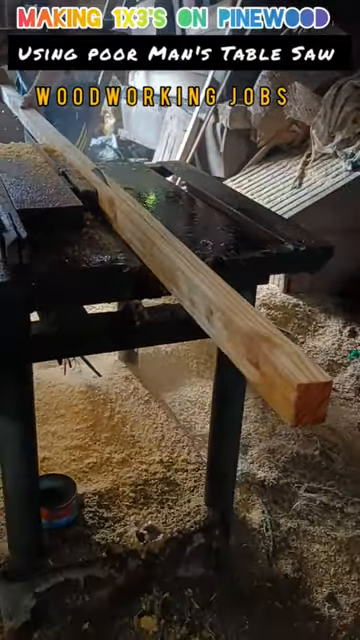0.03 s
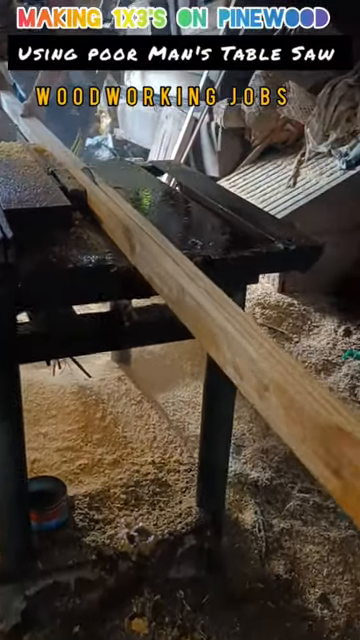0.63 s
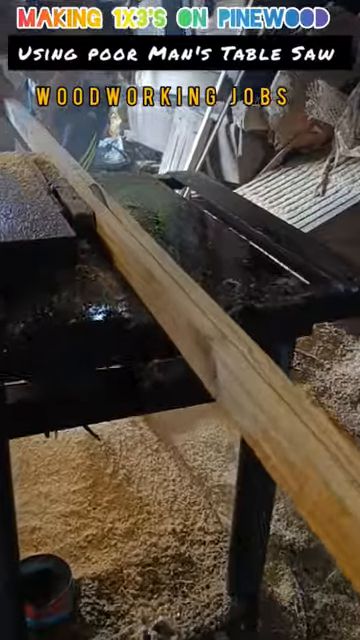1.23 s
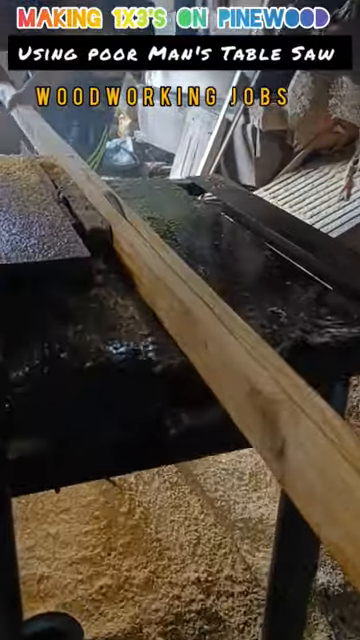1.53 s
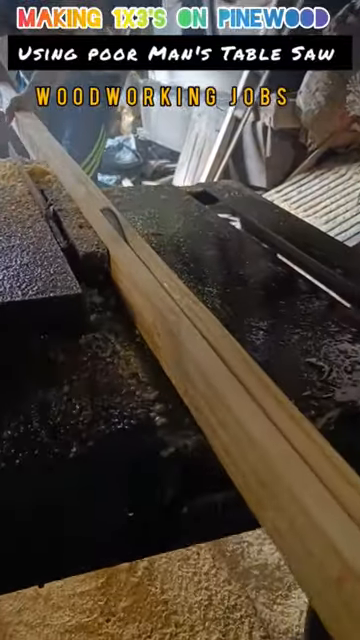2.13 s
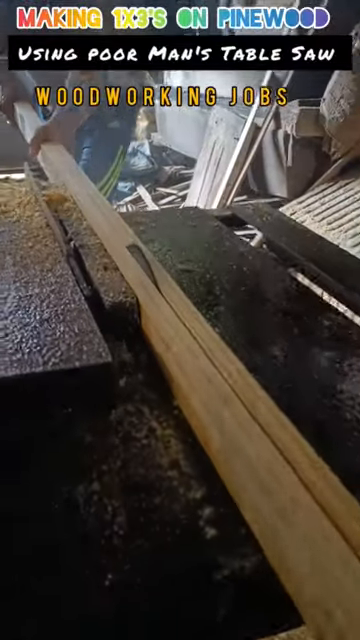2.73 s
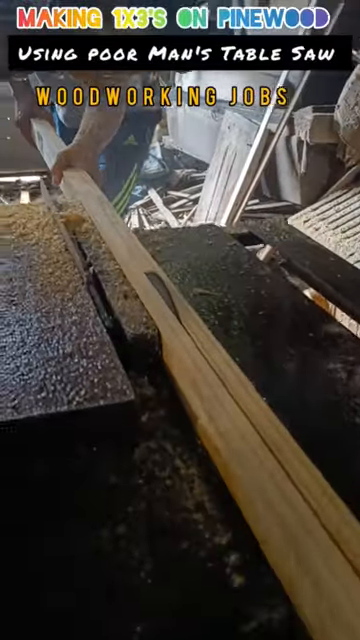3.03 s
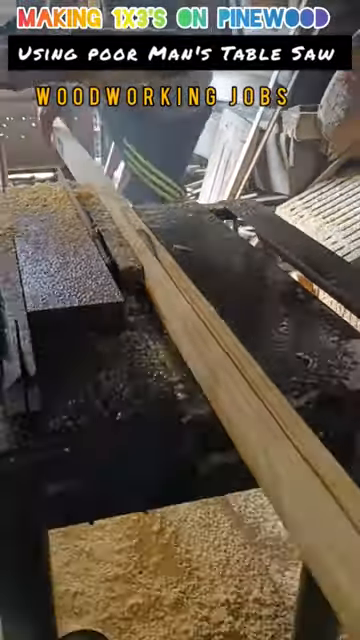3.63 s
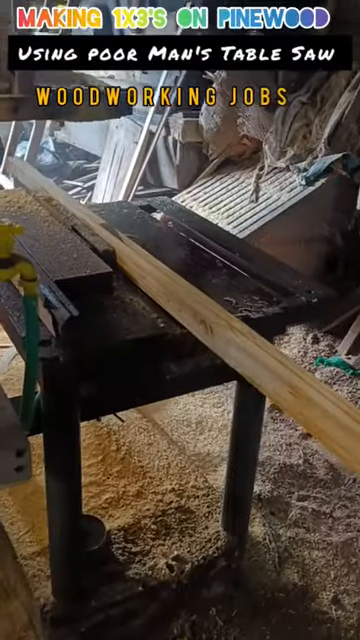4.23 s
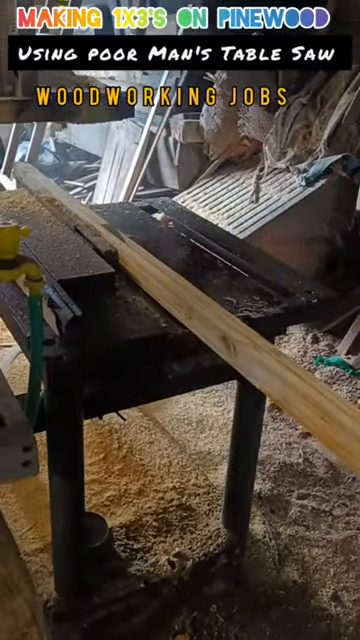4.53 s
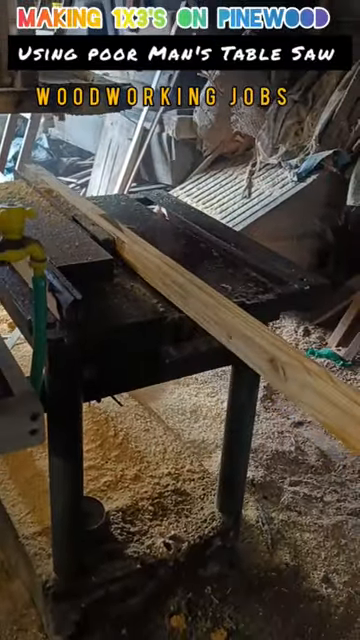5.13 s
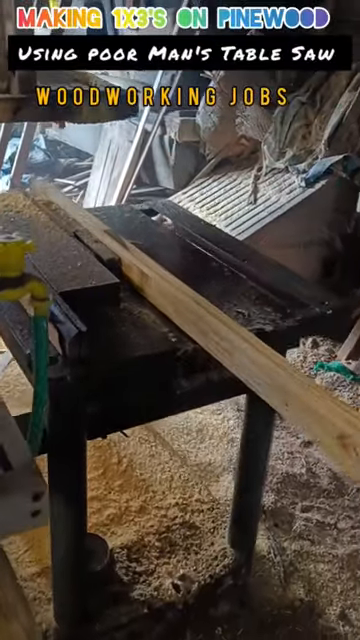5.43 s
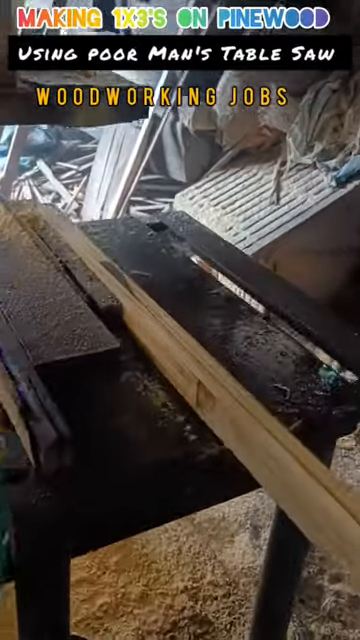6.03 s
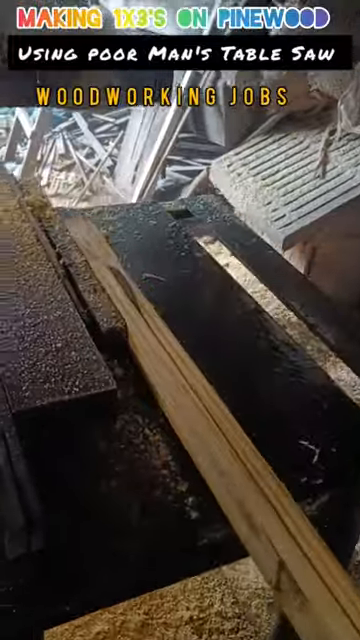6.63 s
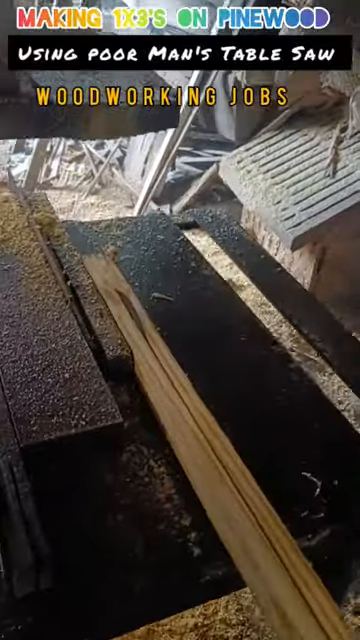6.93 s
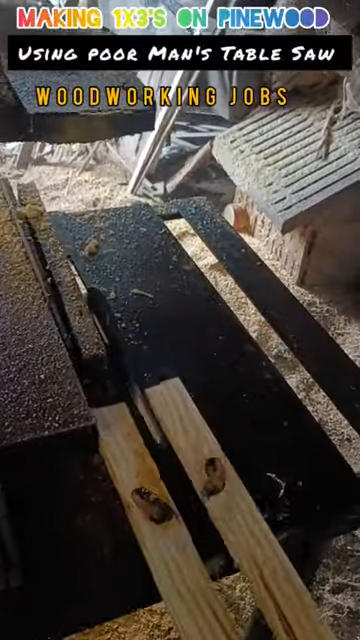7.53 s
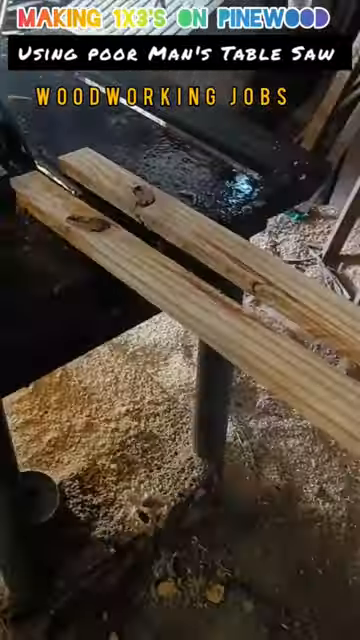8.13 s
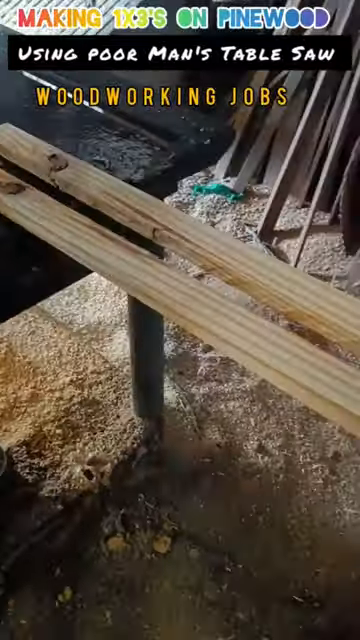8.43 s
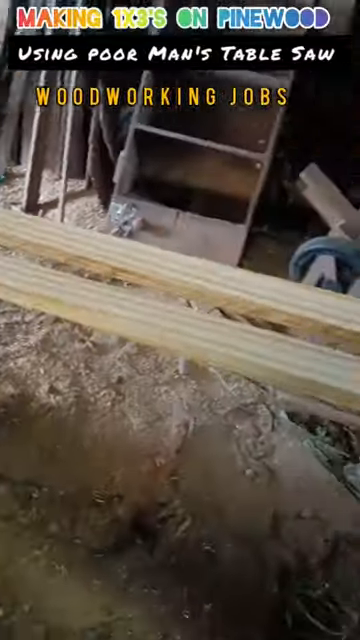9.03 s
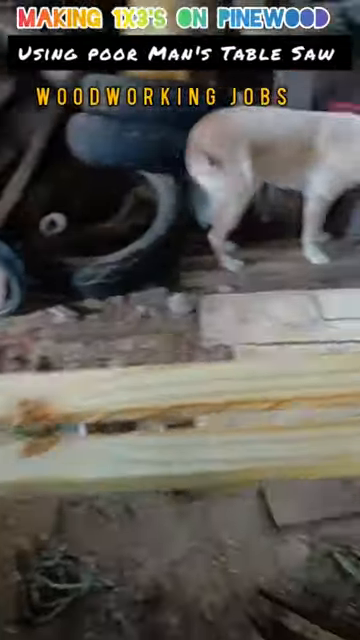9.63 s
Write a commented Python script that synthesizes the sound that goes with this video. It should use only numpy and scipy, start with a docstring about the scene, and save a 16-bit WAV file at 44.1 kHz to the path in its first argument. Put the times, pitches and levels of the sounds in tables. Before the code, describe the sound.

A table saw whines and rasps through a long board, with squeals from the wood, then runs free with a quieter engine hum.

```python
"""Ripping pine on a table saw

A long board is fed into an engine-driven saw in an open shed. The periodic impact of the teeth gives
a whine that falls in pitch under load, torn fibres a broadband rasp, and the pinched board squeals.
Draught and chips strike a hand-held two-port microphone, mainly on the right. The board comes free.
The level dips briefly twice; after the second dip the engine is heard from the yard, easing off."""
import sys
import numpy as np
from scipy import signal
from scipy.fft import rfft, irfft
from scipy.io import wavfile

SR = 44100
rng = np.random.default_rng(int(sys.argv[2]) if len(sys.argv) > 2 else 0)


def materialize(psi):
    """Save the field psi as 16-bit PCM at rate SR to the path in sys.argv[1].

    A 1-D psi becomes a single channel; in a 2-D psi each row is a channel.
    """
    bounded = np.clip(np.atleast_2d(psi).T, -1, 1)
    quanta = np.round(bounded * 32767).astype(np.int16)
    wavfile.write(sys.argv[1], SR, quanta)


N = 436149
TIME = np.arange(N) / SR
FREQS = np.maximum(np.arange(N // 2 + 1) * SR / N, 1)
TEETH = 30


# unevenness of the bite: t/s, share of chatter (0-1), depth of the once-a-turn flutter (0-1)
BITE = [(0, .62, .05), (1.4, .9, .15), (2.2, .52, .45), (3.5, .6, .2), (3.85, .48, .85), (4.9, .8, .1),
        (6.3, .62, .3), (7.2, .33, .1)]
WORKING_HZ, SAG_DB_PER_HZ = 1339, .032  # the whine grows as the tooth rate sags below its working value

def whine(tooth, tooth_hz, rasp_db, flank_db, surge_db, octave_surge_db):
    """Periodic forcing: tooth impacts sound three harmonics, and uneven bites add noise sidebands."""
    scraping_db = flank_db - flank_db.mean()  # a scraping flank feeds every harmonic
    sag_hz = WORKING_HZ - tooth_hz
    whine_db = -20.5 + SAG_DB_PER_HZ * sag_hz + .27 * scraping_db + surge_db
    octave_db = -32.7 + SAG_DB_PER_HZ * np.maximum(sag_hz, 0) + .6 * scraping_db + octave_surge_db
    third_db = rasp_db - 10 + .23 * scraping_db
    rough, flutter = np.clip(curves(BITE), 0, 1)
    rough = np.clip(rough - .017 * surge_db, 0, 1)  # a surge locks the blade into a purer tone
    uneven = 1.72 * chatter(width_hz=43, alike=.3) + .67 * chatter(width_hz=96, alike=.26)
    lag = np.array([[0], [.9]]) * wobble(hz=2.6)  # phase between the ports of the moving microphone
    first = np.sqrt(1 - rough ** 2) * np.exp(1j * lag) + rough * uneven
    first = first / np.sqrt(.7 + .47 * abs(first) ** 2)  # the whine's loudest peaks are softly limited
    harder_bite = 1 + flutter * np.sin(tooth / TEETH + 2 * wobble(hz=14))  # the blade wobbles
    first = first * harder_bite / np.sqrt(1 + flutter ** 2 / 2)
    second = .5 + .68 * chatter(width_hz=46, alike=.54)
    third = chatter(width_hz=55, alike=.33)
    spin = np.exp(1j * tooth)
    tone = undb(whine_db) * first * spin + undb(octave_db) * second * spin ** 2
    tone += undb(third_db) * third * spin ** 3
    return np.sqrt(2) * tone.imag


# binding of the wood: centre t/s, duration/s, rise of the whine/dB, rise of its octave/dB
SURGES = [(0.055, 0.41, 9, 2), (0.362, 0.24, 10, 4), (0.556, 0.24, 10, -10), (0.758, 0.21, 5, 15),
          (0.928, 0.25, 9, 8), (1.167, 0.13, 4, 9), (1.276, 0.069, -2, 14), (1.468, 0.13, 3, 15.5),
          (1.855, .2, 3.5, 0), (2.128, 0.085, 8.5, 0), (2.292, 0.09, 8.5, 7), (2.389, 0.072, 3, 16),
          (2.68, .3, 4, 11), (2.9, .25, 0, 9), (3.43, .22, 5.5, 0), (4.043, 0.53, 5.5, 6),
          (4.382, 0.29, 6.5, 3), (4.548, .1, -0.5, 6), (4.889, 0.17, 3, 5), (5.653, 0.13, 9.5, 4),
          (5.9, 0.42, 5, 5.5), (6.803, 0.24, 6.5, 11), (6.949, 0.2, 6.5, 12.5), (7.269, 0.15, 7, 9)]

def surges():
    """Binding wood drives the blade harder; returns the rises in dB of the whine and its octave."""
    return sum(np.outer(rises_db, swell(s, length)) for s, length, *rises_db in SURGES)


# spectra of the teeth's rasp, the board, the blade's flank and the table: f/Hz, relative level/dB
RASP_SPECTRUM = [(1200, -18.5), (3400, -7), (4100, -1.5), (4600, -3), (5300, 1.5), (6200, -2.5), (6900, 3),
                 (8200, 1.5), (8800, -3.5), (9300, 2), (10200, -3.5), (11300, -9.5), (12400, -5.5),
                 (15500, -9)]
BOARD_SPECTRUM = [(60, -25), (330, -29), (700, -13), (880, -0.5), (1080, -4), (1300, 7), (1600, 1),
                  (2050, 2), (2400, -1.5), (2680, 1), (3000, -10), (5000, -29)]
FLANK_SPECTRUM = [(2000, -31), (2950, 0.5), (3350, 5.5), (3900, 1.5), (4600, -4.5), (6500, -27)]
TABLE_SPECTRUM = [(40, -17), (75, 0.5), (130, -9), (190, -4), (320, -4.5), (420, 0), (620, 5.5),
                  (800, -3.5), (1300, -21.5)]

def kerf(tooth, rasp_db, flank_db, surge_db, near):
    """Source and filter: the noise of tearing fibres is shaped by blade, board and table."""
    board_db = -19 + .51 * (rasp_db - rasp_db.mean()) - .18 * surge_db
    table_db = -39 + 7 * near
    pulsing = (1 + .26 * np.cos(tooth)) * (1 + .12 * np.sin(tooth / TEETH))  # per tooth, per turn
    tearing = pulsing * undb(wobble(hz=906))
    rasp = spread(noise() * tearing * undb(.99 * wobble(hz=44.8)), response(RASP_SPECTRUM))
    rasp = wander(rasp, width_hz=300, life_s=.066, db=1.26)  # the bite shifts among blade modes
    board = spread(noise() * tearing * undb(1.1 * wobble(hz=35.02)), response(BOARD_SPECTRUM))
    flank = spread(noise() * tearing, response(FLANK_SPECTRUM))
    table = spread(noise(), response(TABLE_SPECTRUM))
    cut = rasp * undb(rasp_db + 6) + board * undb(board_db)
    cut += flank * undb(flank_db + 1.5) + table * undb(table_db)
    # the narrow modes of blade and board shift as the kerf grows
    return np.std(cut) * wander(cut, width_hz=51, life_s=.16, db=3)


# the board pinches the blade: centre t/s, duration/s, start f/Hz, end f/Hz, level/dB
SQUEALS = [(.45, .8, 930, 890, -33), (1.569, .4, 1758, 1707, -24.5), (1.658, .22, 3360, 3480, -26.5),
           (1.824, 0.24, 4200, 3950, -25), (2.04, 0.27, 2440, 2360, -25), (3.058, 0.65, 1614, 1593, -29.5),
           (4.37, .35, 4110, 4060, -28), (4.85, .5, 1227, 1105, -29), (5.25, .6, 1620, 1592, -26.5),
           (5.387, .16, 3320, 3280, -29), (5.68, .25, 4020, 3990, -29), (5.858, 0.46, 1574, 1658, -22.5),
           (6.063, 0.32, 2054, 1920, -25), (6.237, 0.65, 935, 890, -26), (6.259, .42, 1072, 1030, -27),
           (6.4, 0.167, 1170, 1220, -21.5), (7.201, 0.45, 1910, 1830, -30), (7.55, 0.31, 2070, 2068, -35)]

def squeals():
    """Frictional excitation: narrow resonances of the pinched board swell, glide and die away."""
    out = np.zeros((2, N))
    ringing = .19 + chatter(width_hz=26, alike=.84)
    for s, length, start_hz, end_hz, db in SQUEALS:
        span = np.flatnonzero(abs(TIME - s) < length / 2)
        tone = np.exp(1j * turns(np.linspace(start_hz, end_hz, len(span))))
        envelope = np.sqrt(2 * np.hanning(len(span)))
        waver = ringing[:, (span + rng.integers(N)) % N]
        out[:, span] += undb(db) * envelope * (tone * waver).imag
    return out


# the sawn halves touch the free teeth: t/s, level/dB
GRAZES = [(7.477, -30), (7.645, -28)]

def grazes(tooth):
    """Brief contact excites a ping on the second and third harmonics of the tooth rate."""
    ping = np.sin(2 * tooth) + undb(-5) * np.sin(3 * tooth)
    return np.sqrt(2) * ping * sum(undb(db) * swell(s, length=.028) for s, db in GRAZES)


PASS_S, PASS_M, WALK_M_PER_S = 9.05, .53, 1.36  # walking past the exhaust: time, least distance, speed

def running(shaft, shaft_hz, in_wood):
    """Whirr and engine; in the yard the whirr follows shaft speed, the exhaust the inverse-square law."""
    yard = TIME > DIP_TIMES[1]
    whirr_db = np.where(yard, -28.5 + .42 * (shaft_hz - 46.5), -30.5 - 13 * in_wood)
    opening_db = -48 + 9.5 * ramp(end=7.82, length=.11)  # the exhaust opens up once the load is gone
    passing_db = -30.5 - 20 * np.log10(np.hypot(1, WALK_M_PER_S * (TIME - PASS_S) / PASS_M))
    exhaust_db = np.where(yard, passing_db, opening_db) - 13.6 * in_wood
    return whirr(shaft, whirr_db) + engine(shaft, yard) * undb(exhaust_db)


# engine orders: multiple of the shaft rate, relative level/dB at the table, relative level/dB in the yard
ENGINE_ORDERS = [(1, -27, -17), (2, -11, -12), (3, 8, -3), (4, -14, -1.5), (5, -22, -5.5), (6, -27, -4),
                 (8, -3.5, -15), (9, -7, -31), (11, -6, -12)]

def engine(shaft, yard):
    """A harmonic series on the shaft rate, modulated in phase and amplitude by uneven firing."""
    crank = shaft + .18 * wobble(hz=16)
    hum = 0
    for order, table_db, yard_db in ENGINE_ORDERS:
        amplitude = undb(np.where(yard, yard_db, table_db) + 2.6 * wobble(hz=5))
        hum = hum + amplitude * np.sin(order * crank + rng.uniform(0, 2 * np.pi))
    return hum


# spectrum of air noise and clatter: f/Hz, relative level/dB
WHIRR_SPECTRUM = [(30, -25), (80, -5), (280, -10), (345, -15), (480, -7.5), (730, -11.5), (1000, -8),
                  (1400, -11), (2400, -13), (3400, -20.5), (6400, -26.5), (9200, -27), (11200, -35.5),
                  (12600, -29), (15000, -39)]
# resonances of the spinning blade and its steel table: f/Hz, bandwidth/Hz, relative level/dB
TABLE_MODES = [(400, 12, -14.5), (863, 65.2, -11), (1285, 100, -3.5), (1412, 46, -3.5)]

def whirr(shaft, whirr_db):
    """Turbulence at the blade and the clatter of belt and engine force the table's modes."""
    clatter = (1 + .19 * np.cos(shaft)) * undb(1.43 * wobble(hz=40))
    air = spread(noise() * clatter, response(WHIRR_SPECTRUM))
    air = wander(air, width_hz=37, life_s=.91, db=3)
    modes = sum(undb(db) / np.sqrt(width) / (1 + 1j * (FREQS / hz - hz / FREQS) * hz / width)
                for hz, width, db in TABLE_MODES)
    sawdust = spread(noise(), response(RASP_SPECTRUM)) * undb(-36 + 4.8 * wobble(hz=34.9))  # in spurts
    ringing = spread(noise() * clatter, modes)
    return (sawdust + air * undb(2.5) + ringing * undb(1)) * undb(whirr_db)


# spectrum of the blade's draught: f/Hz, relative level/dB
DRAUGHT_SPECTRUM = [(15, -2), (40, -2.5), (90, -8), (200, -12), (500, -17), (1500, -64)]
# gusts: centre t/s, duration/s, rise/dB
GUSTS = [(1.157, .14, 18), (5.25, 1.1, 8), (6.623, 0.16, 13), (7, 0.29, 7.5), (7.35, 0.095, 14),
         (9.149, .8, 14)]

def draught(near):
    """Turbulent pressure: air thrown off the blade buffets the microphone, more strongly close by."""
    level_db = -53 + 25.5 * near + sum(db * swell(s, length) for s, length, db in GUSTS)
    pressure = unit(colour(rng.standard_normal(N), response(DRAUGHT_SPECTRUM)))
    return pressure * undb(level_db + 2.7 * wobble(hz=17))


# chips striking the microphone: t/s, relative level/dB
CHIPS = [(1.804, -14.5), (2.087, -16), (2.428, -10.5), (2.594, -15), (2.773, -15), (2.987, -12),
         (3.045, -9.5), (3.283, -8), (6.543, -14), (6.611, -10.5), (6.66, -13.5), (7.002, -13),
         (7.061, -14), (7.083, -13), (7.332, -12.5)]
CHIP_DECAY_S = .0012

def chips():
    """Impulse response of a port: each chip's push leaks away exponentially with one slow rebound."""
    knocks = np.zeros(N)
    for s, db in CHIPS:
        span = np.flatnonzero((TIME >= s) & (TIME < s + .05))
        age = TIME[span] - s
        push = np.exp(-age / CHIP_DECAY_S) - .19 * np.exp(-age / (4 * CHIP_DECAY_S))
        knocks[span] -= undb(db + 9) * push
    return signal.sosfilt(signal.butter(2, 480, fs=SR, output="sos"), knocks)


def frame():
    """Forced vibration: the table's frame rumbles in its lowest mode while the board is pushed hard."""
    hz, half_width_hz = 74, 24
    rumble = colour(rng.standard_normal(N), 1 / (1 + ((FREQS - hz) / half_width_hz) ** 4))
    return unit(rumble) * undb(-48) * swell(5.1, length=1.7)


# coherence of the two ports in the shed: f/Hz, correlation (0-1)
COHERENCE = [(100, 1), (750, 0.56), (1400, 0.13), (2700, 0.18), (3300, 0.012), (5000, 0.18), (5900, 0.16),
             (7250, 0), (7750, 1), (8700, 0.56), (9400, 0.41), (11000, 0.029), (13400, 1), (14300, 0.23)]

def spread(pair, gain):
    """Partial coherence: two independent sounds are filtered and mixed as sum and difference; rms 1."""
    alike = np.clip(over_hz(COHERENCE), -1, 1)
    mid, side = colour(pair, gain * np.sqrt([1 + alike, 1 - alike]))
    return unit(np.array([mid + side, mid - side]))


def chatter(width_hz, alike):
    """Narrow-band noise: the complex envelope of an unevenly struck resonance, at each port."""
    steps = np.arange(N // 32 + 2)
    draws = rng.standard_normal((3, len(steps))) + 1j * rng.standard_normal((3, len(steps)))
    slow = signal.sosfilt(signal.butter(2, width_hz, fs=SR / 32, output="sos"), draws)
    ports = np.sqrt(alike) * slow[0] + np.sqrt(1 - alike) * slow[1:]
    ports = ports / np.std(ports)
    return np.array([np.interp(np.arange(N) / 32, steps, port) for port in ports])


def wander(pair, width_hz, life_s, db):
    """Spectral modulation: random peaks about width_hz wide come and go, lasting about life_s; rms 1."""
    _, _, spectra = signal.stft(pair, nperseg=2048, noverlap=1536)
    field = rng.standard_normal(spectra.shape[1:])
    across = np.fft.fftfreq(field.shape[0], SR / 2048)[:, None] * width_hz
    along = np.fft.rfftfreq(field.shape[1], 512 / SR) * life_s
    smoothing = np.exp(-2 * (across ** 2 + along ** 2))
    field = unit(np.fft.irfft2(np.fft.rfft2(field) * smoothing, field.shape))
    _, sound = signal.istft(spectra * undb(db * field), nperseg=2048, noverlap=1536)
    return unit(sound[:, :N])


def wobble(hz):
    """Random fluctuation up to about hz; rms 1."""
    draws = rng.standard_normal(N // 16)
    return unit(np.interp(2 * hz * TIME, np.arange(len(draws)), draws))


def noise():
    """Two independent white noises."""
    return rng.standard_normal((2, N))


def colour(x, gain):
    """Filtering as multiplication of the spectrum."""
    return irfft(rfft(x) * gain, N)


def response(table):
    """Amplitude response from points of f/Hz, level/dB."""
    return undb(over_hz(table))


def over_hz(table):
    """Interpolation on a logarithmic frequency axis."""
    hz, value = np.transpose(table)
    return np.interp(np.log(FREQS), np.log(hz), value)


def curves(table):
    """Linear interpolation in time of each column after t/s."""
    s, *columns = np.transpose(table)
    return [np.interp(TIME, s, column) for column in columns]


def turns(hz):
    """Phase in radians as the integral of frequency."""
    return 2 * np.pi * np.cumsum(hz) / SR


def swell(s, length):
    """A half-cosine envelope, 0-1, centred on s."""
    return np.cos(np.pi * np.clip((TIME - s) / length, -.5, .5))


def ramp(end, length):
    """A linear rise from 0 to 1, complete at end."""
    return np.clip(1 + (TIME - end) / length, 0, 1)


def undb(db):
    """Decibels to amplitude ratio."""
    return 10 ** (np.asarray(db) / 20)


def unit(x):
    """Normalisation to rms 1."""
    return x / np.sqrt(np.mean(x ** 2))


# tooth rate, sagging as the board is pushed and recovering as the push eases: t/s, f/Hz
LOADED_TOOTH_RATE = [(0, 1378), (.35, 1351), (.8, 1294), (1.03, 1235), (1.2, 1304), (1.35, 1479),
                     (1.47, 1473), (1.9, 1357), (2.6, 1330), (3.42, 1329), (3.74, 1526), (3.78, 1364),
                     (4.25, 1382), (4.75, 1347), (5.97, 1360), (6.3, 1306), (6.76, 1360), (6.95, 1321),
                     (7.35, 1321)]
# shaft rate as the unloaded engine eases off: t/s, f/Hz
FREE_SHAFT_RATE = [(7.5, 49.9), (8.05, 49.8), (8.2, 47.3), (9, 45.32), (9.89, 40.27)]
# rasp early and late in the cut, and scrape of the blade's flank: t/s, relative level/dB
RASP_EARLY = [(0.12, -23), (0.98, -25), (1.14, -20.5), (1.34, -26), (1.64, -22), (3.34, -21), (3.68, -27)]
RASP_LATE = [(3.98, -23), (4.02, -22.5), (5.58, -21), (5.66, -24), (6.62, -20), (6.81, -24), (7.33, -22)]
FLANK_SCRAPE = [(1, -37.5), (1.8, -28), (2.5, -32.5), (3.1, -40.5), (4, -28), (5.4, -23.5), (6.3, -35),
                (7.3, -30)]
# microphone's approach to the blade: t/s, nearness (0-1)
NEARNESS = [(.4, 0.45), (1, 0), (1.4, 0.2), (2.1, 0.76), (3.1, 0.96), (3.75, 0.23), (5.8, .15), (6.6, 0.86),
            (7.3, .7), (7.6, 0)]
FREE_S, CLEAR_S = 7.49, 7.71  # the board has left the teeth; its halves are clear of the blade

def scene():
    """Superposition: one shaft rate tunes engine and blade; cutting ends as the board leaves."""
    rasp_db = curves(RASP_EARLY + RASP_LATE)[0]
    flank_db = curves(FLANK_SCRAPE)[0]
    near = curves(NEARNESS)[0]
    in_wood = 1 - ramp(FREE_S, length=.115)
    brushing = undb(-10 - 32 * np.maximum(TIME - FREE_S, 0))  # the halves touch ever more lightly
    contact = (in_wood + (1 - in_wood) * brushing) * (1 - ramp(CLEAR_S, length=.05))
    shaft_hz = in_wood * curves(LOADED_TOOTH_RATE)[0] / TEETH + (1 - in_wood) * curves(FREE_SHAFT_RATE)[0]
    shaft = turns(shaft_hz)
    tooth = TEETH * shaft + turns(6 * wobble(hz=14))
    surge_db, octave_surge_db = surges()
    cutting = whine(tooth, TEETH * shaft_hz, rasp_db, flank_db, surge_db, octave_surge_db)
    cutting += kerf(tooth, rasp_db, flank_db, surge_db, near)
    grain = undb(.59 * wobble(hz=28.02))  # hard and soft growth rings
    wood = cutting * grain * contact + squeals() + grazes(tooth)
    machine = running(shaft, shaft_hz, in_wood) + frame()
    buffeting = (draught(near) + chips()) * undb([[-20], [0]])  # mainly on the right port
    return wood + machine + buffeting


# notched responses of the microphone ports: f/Hz, gain/dB
LEFT_PORT = [(1500, 0), (3300, -3), (4300, -2.5), (5700, -8), (6500, -17), (7100, -20), (7700, -8.5),
             (8600, 2), (13500, -6.5), (13900, -20), (14400, -7), (15200, -20)]
RIGHT_PORT = [(8700, 0.5), (9200, -2.5), (9550, -22), (9850, -24), (10200, -14), (10500, -18),
              (11200, -5.5)]
# onsets of the brief dips in level: t/s
DIP_TIMES = [3.757, 8.072]
DIP_DB, RECOVERY_S, TOP_HZ = -24, .16, 15600

def record(dry):
    """Frequency response: the ports notch the treble; the sound dips twice, is clipped and low-passed."""
    sound = colour(dry, np.array([response(LEFT_PORT), response(RIGHT_PORT)]))
    for s in DIP_TIMES:
        recovery = np.maximum(ramp(s + RECOVERY_S, RECOVERY_S) ** .7, undb(DIP_DB))
        sound = sound * np.where(TIME < s, 1, recovery)
    lowpass = signal.ellip(10, .2, 80, TOP_HZ, fs=SR, output="sos")
    return signal.sosfilt(lowpass, np.clip(sound, -1, 1))


dry = scene()
out = record(dry)
materialize(out)
```